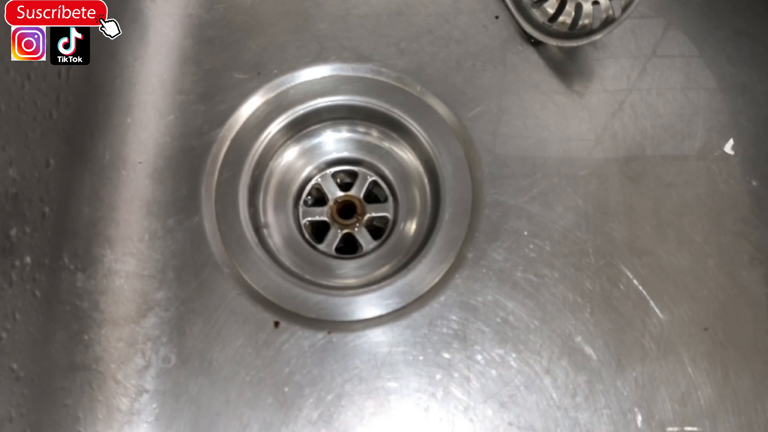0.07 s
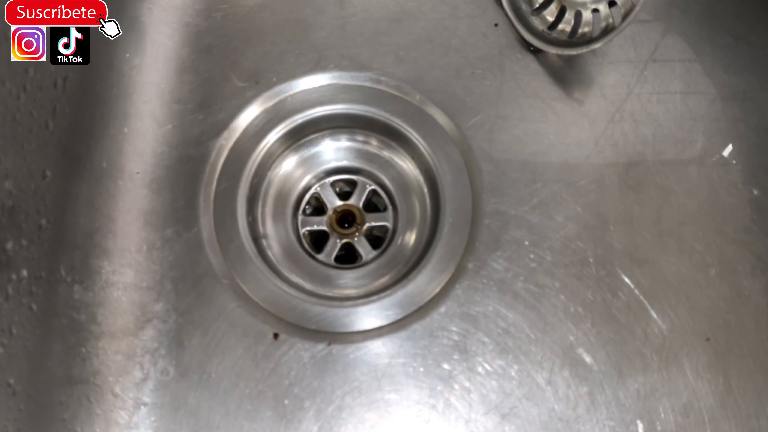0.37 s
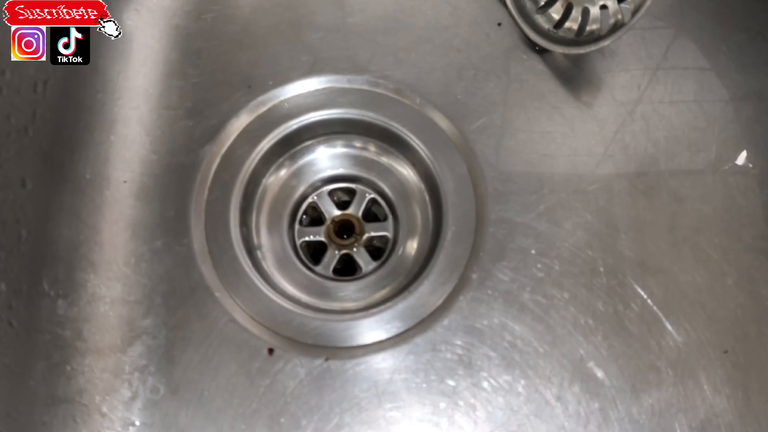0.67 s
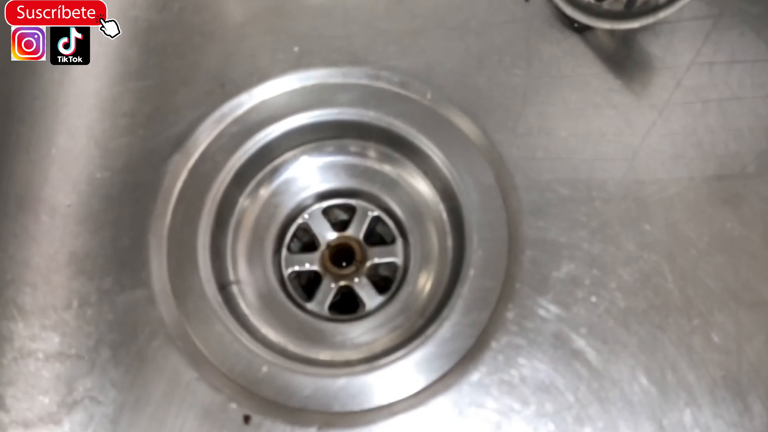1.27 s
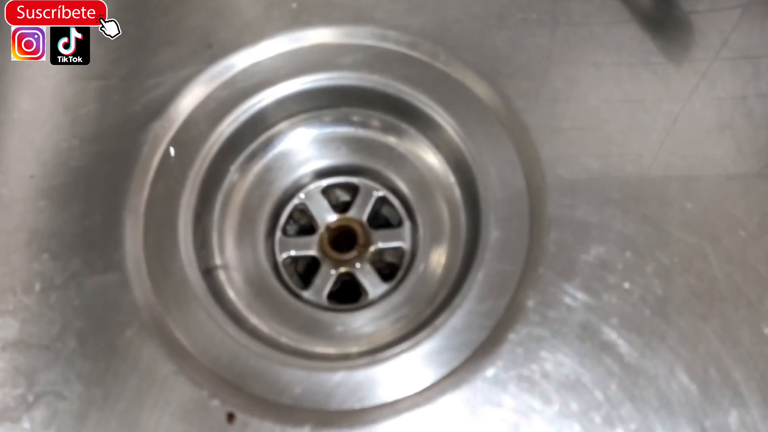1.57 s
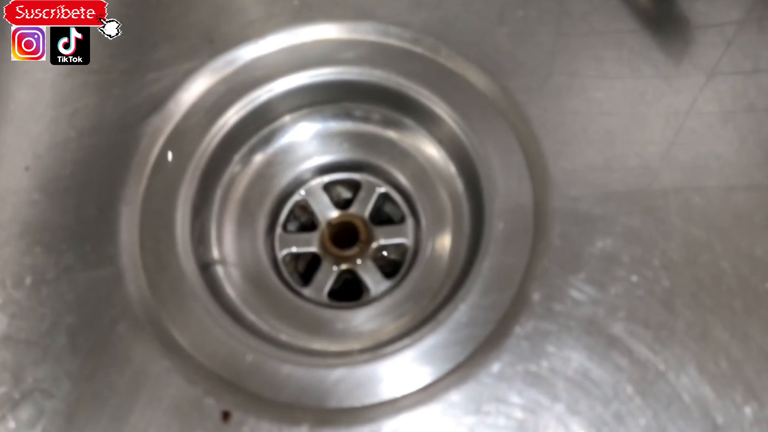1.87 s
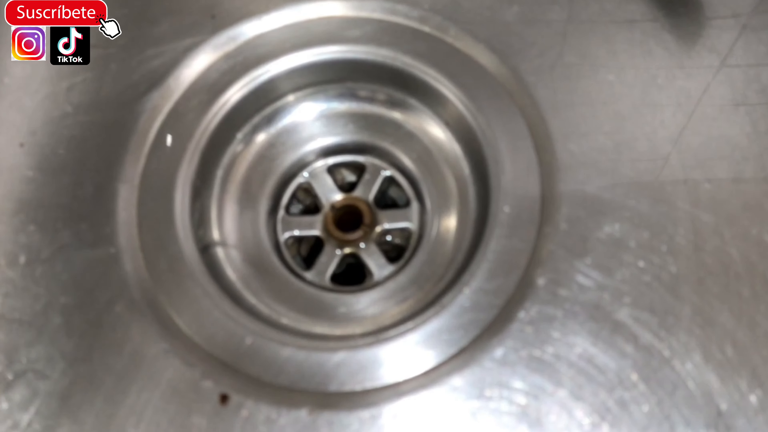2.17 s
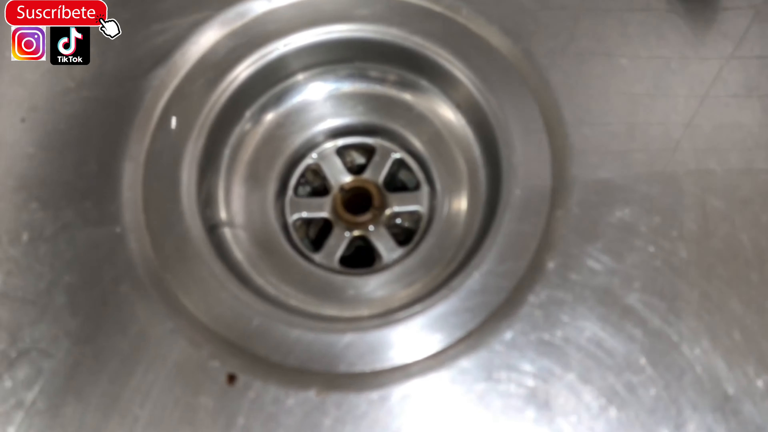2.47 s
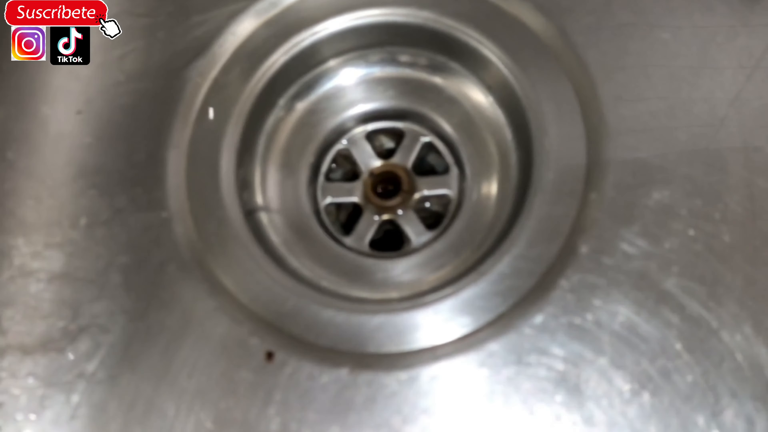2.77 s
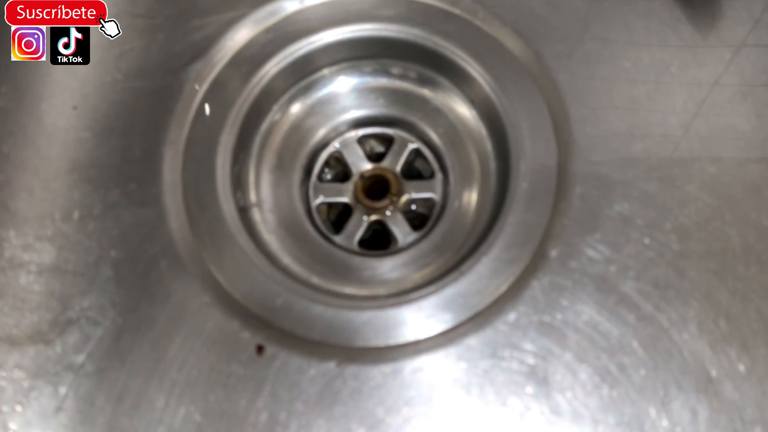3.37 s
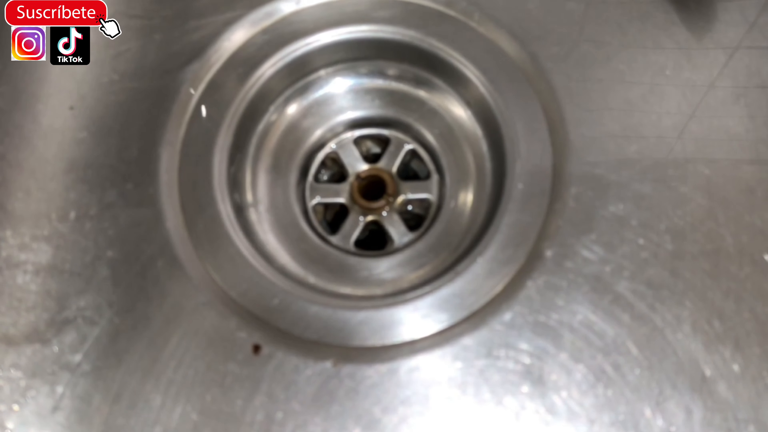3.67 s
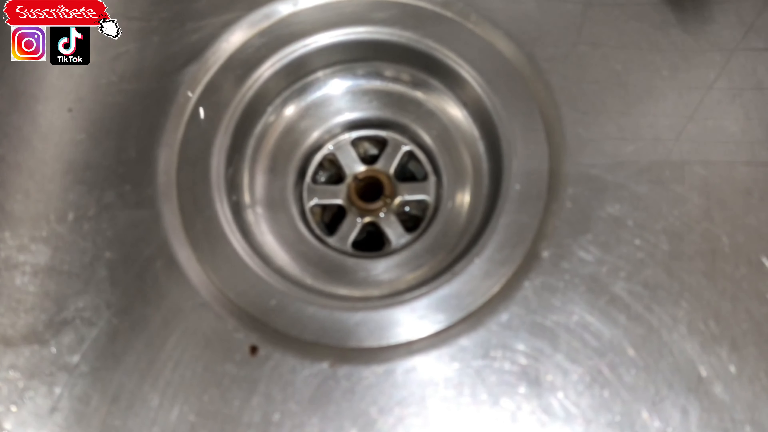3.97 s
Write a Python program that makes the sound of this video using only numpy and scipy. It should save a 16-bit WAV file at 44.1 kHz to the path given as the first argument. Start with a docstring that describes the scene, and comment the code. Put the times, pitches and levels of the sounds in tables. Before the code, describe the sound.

Water gurgling in a kitchen sink drain, hollow glugs and small wet pops close by.

```python
"""In a small, quiet kitchen, air glugs up through the water in a steel sink's drain, close by.
Each big bubble rings briefly and sets the drain pipe booming. Bubble films burst with a wet
crack and leave foam, while tiny bubbles ping and fizz and the water sloshes.
The steel basin and the room ring on as the glugs thin out."""
import sys
import numpy as np
from scipy import signal
from scipy.fft import rfft, irfft
from scipy.io import wavfile

SR = 44100
rng = np.random.default_rng(int(sys.argv[2]) if len(sys.argv) > 2 else 0)


def wrap_up_sound(samples):
    """Save the sound to the file named by the first command line argument, as 16-bit audio."""
    columns = np.atleast_2d(samples).T
    # keep every value between -1 and 1, then stretch to whole-number steps
    tamed = np.clip(columns, -1, 1)
    steps = np.round(tamed * 32767).astype(np.int16)
    wavfile.write(sys.argv[1], SR, steps)


N = 176400  # 4 seconds

# The kitchen's steady rush. Each row: frequency in Hz, relative level in dB.
RUSH_COLOUR = [(25, -33), (100, 9), (250, 10), (600, -14.5), (1200, -15), (4000, -20.5), (9000, -22),
               (16000, -26)]
# The kitchen's echo. Each row: frequency in Hz, fade time in seconds (to drop 60 dB, "t60").
ROOM_FADE = [(100, 0.42), (260, 0.61), (700, 0.13), (1800, 0.17), (5000, 0.14), (14000, 0.19)]
# How alike echoes are in both ears. Each row: frequency in Hz, likeness from 0 to 1.
ECHO_LIKENESS = [(100, 1), (250, 0.7), (450, 0.17), (2000, 0), (10000, 0)]
# How strongly the water is stirred. Each row: time in seconds, level in dB.
STIRRING = [(0, 3.5), (.4, -3.5), (.7, 4), (1.0, -11), (1.3, -2.5), (1.65, -3.5), (1.9, -19), (2.3, -8.5),
            (2.7, -7.5), (3.0, -22), (3.45, -15.5), (3.6, -15.5), (4, -7.5)]
# The notes of the steel basin. Each row: pitch in Hz, width in Hz, left and right boosts in dB.
STEEL_NOTES = [(1566, 38, 5, 6), (1750, 15, 7, -12.5), (1957.3, 55, 14.5, 9.5), (2070, 24, 8.5, 8),
               (2820, 19, 5.5, 4), (2640, 8.8, -1.5, -1.5), (2616, 12, 5, 8), (3147, 43, 9, 11.5),
               (4300, 54, 7, 14), (4930, 20, 4, -11.5), (5230, 90, 5.5, -3)]
# Small bubbles. Each row: start in seconds, level in dB, pitch in Hz,
# fade time of the crackle in seconds, left minus right in dB.
SMALL_BUBBLES = [(0.0094, -31, 4410, 0.021, 16.5), (0.214, -39.5, 2320, 0.046, 13),
                 (0.239, -35, 2780, 0.035, 1), (0.251, -32.5, 2455, 0.062, 4),
                 (0.3568, -33, 2110, 0.036, 6), (0.3782, -33.5, 2540, 0.043, 2.5),
                 (0.5215, -39.5, 7140, 0.069, 0.5), (0.6, -3.5, 2280, 0.012, 4.5),
                 (0.611, -10.5, 1800, 0.012, 5), (0.8775, -23.5, 5010, 0.039, 7.5),
                 (1.233, -56, 1900, 0.012, 4.0), (1.2706, -40, 2250, 0.055, 5),
                 (1.282, -36.5, 2030, 0.032, 4.0), (1.351, -24, 4050, 0.022, 16.5),
                 (1.3806, -29, 4360, 0.036, 9), (1.503, -27.5, 6830, 0.034, 0.0),
                 (1.5304, -36, 2060, 0.05, 1.5), (1.6013, -23, 2020, 0.032, -1),
                 (1.6906, -38, 2080, 0.025, 3), (1.928, -34.5, 2106, 0.024, -1),
                 (1.987, -35, 7730, 0.035, -6), (2.133, -38, 2060, 0.044, 4),
                 (2.1705, -32.5, 2090, 0.065, 3.5), (2.3437, -40.5, 2050, 0.035, 4),
                 (2.3623, -30, 7210, 0.012, -1), (2.5493, -41.5, 2140, 0.039, 0.5),
                 (2.6963, -37, 8680, 0.027, -8), (2.7955, -49.5, 8150, 0.032, -5),
                 (2.825, -39.5, 1950, 0.027, 1.0), (2.8675, -40, 2080, 0.023, 1.0),
                 (2.913, -27, 7700, 0.019, -1), (3.0066, -40, 7540, 0.024, -8),
                 (3.1032, -35.5, 3890, 0.051, 6), (3.2326, -42, 8700, 0.035, -1.5),
                 (3.2909, -26, 2060, 0.018, 5.5), (3.3382, -40.5, 4000, 0.031, 7),
                 (3.7649, -29, 1850, 0.026, 0), (3.9075, -44.5, 2240, 0.067, 5)]
# Bursting films. Each row: start in seconds, level in dB, boosts in dB at 2, 4.5 and 10 kHz,
# fade time in seconds, left minus right in dB.
FILM_BURSTS = [(0.0822, -31.5, -15, -16.5, -1, 0.11, 1.0), (0.1002, -23.5, -14, -19, -12, 0.093, 2.5),
               (0.4319, -14, -18, -13.5, -3, 0.023, 2), (0.5786, -27, -10, -1.5, -12.5, 0.02, 2),
               (0.6, -6.5, -22.5, -8.5, -13, 0.033, 8.5), (0.6194, -13, -15.5, -14.5, -16.5, 0.11, 2.5),
               (0.7372, -30.5, -8, -19.5, -13, 0.066, 3.5), (0.8924, -19, -12, -12, -10, 0.04, 3),
               (0.9966, -37.5, -5, -17, -13, 0.031, 8.5), (1.0695, -42.5, -4.5, -3, -8, 0.028, 0),
               (1.1343, -28, -15, -9, -14.5, 0.066, 1.5), (1.3443, -15, -9.5, -6, -15.5, 0.023, 1),
               (1.5599, -41, 1, -7, -22, 0.035, 6), (1.6013, -9.5, -6, -10.5, -12.5, 0.018, 1.5),
               (1.7494, -14.5, -8.5, -11.5, -8.5, 0.015, 0), (1.8123, -19.5, -19, -5, -8.5, 0.031, -0.5),
               (1.9879, -27, -17.5, -16.5, -7.5, 0.093, 1), (2.1705, -24.5, -4, -15, -11, 0.033, 3.5),
               (2.2238, -34, -7.5, -13.5, -10.5, 0.029, -1), (2.4448, -13.5, -5, -10.5, -7.5, 0.02, 1.5),
               (2.6199, -17, -5.5, -17.5, -13.5, 0.026, 2.0), (2.6858, -34.5, -15, -17, -9, 0.03, 15),
               (2.9003, -31.5, -14.5, -17.5, -18, 0.03, 3.5), (3.0644, -27, -12.5, -16, -7.5, 0.062, 0.0),
               (3.1228, -31, -9.5, -13, -12, 0.027, 2.5), (3.2909, -28, -12, -26, -27, 0.028, -2),
               (3.3523, -28.5, -8.5, -9, -12, 0.04, 0.0), (3.5463, -31.5, -10.5, -16.5, -10.5, 0.11, 6.5),
               (3.5877, -31, -10.5, -14, -5.5, 0.039, 2), (3.7903, -33, -5.5, 0.5, -3, 0.083, 2.5),
               (3.8177, -14.5, -8.5, -16.5, -12, 0.047, 3)]
# The tone colour all bursts start from. Each row: frequency in Hz, level in dB.
FILM_COLOUR = [(60, -15), (250, 22), (700, 13.5), (1100, -17), (1700, -4), (2060, 1), (2900, -9),
               (4500, -4.5), (9000, -6.5), (16000, -27.5)]
# The notes of pipe and basin. Each row: pitch in Hz, width in Hz, left and right boosts in dB.
PIPE_NOTES = [(212.98, 6.98, 14, 16.5), (277.2, 13, 15.5, 17), (340, 14.2, -11, 7.5), (400.1, 12, 17.5, 15),
              (532, 33.6, 3, 12), (579, 7.9, -0.5, 9), (652, 5.2, 1, 4), (769.6, 21.5, 4.5, 18),
              (155, 28, -2, 6), (110.2, 26, 7.5, 9.5)]
# Water churning around a big bubble. Each row: frequency in Hz, level in dB.
CHURN_COLOUR = [(60, -15), (130, 29), (270, 5.5), (400, -2), (560, 6.5), (760, -4), (950, -8), (1400, -9),
                (3000, -16), (16000, -56)]
# Big bubbles. Each row: start in seconds, level in dB, pitch in Hz, fade time in seconds,
# pitch rise per second as a share of the pitch (negative falls), left minus right in dB.
BIG_BUBBLES = [(0.0029, -7, 172.7, 0.037, 5.5, 4), (0.0129, -23.5, 536, 0.1, 8, 14.5),
               (0.0902, -25.5, 281, 0.14, 1.5, 2), (0.1002, -30, 617, 0.093, 0.0, 27.5),
               (0.1321, -4.5, 183, 0.066, 3, 4), (0.2521, -13.5, 484.5, 0.049, -2.5, 1),
               (0.2771, -8.5, 180, 0.043, 4, 4), (0.3922, -7, 513, 0.038, -5, 5),
               (0.4206, -11, 153.3, 0.11, 12, 4.5), (0.431, -18.5, 710, 0.031, -6, 13),
               (0.4307, -14.5, 442, 0.033, 11, 6), (0.5243, -23.5, 730, 0.021, 7, 14),
               (0.571, -4.9, 187, 0.07, 3.5, 4.5), (0.574, -25.5, 398, 0.046, 0, -7),
               (0.6081, -15, 215.6, 0.17, 0.5, 9), (0.6211, -22.5, 491, 0.13, 10.0, 8),
               (0.622, -18.5, 683, 0.041, 5, 12), (0.6227, -11.5, 196.5, 0.17, -0.5, 3.5),
               (0.6784, -19, 164.6, 0.13, 8.5, 3), (0.7372, -28.5, 724, 0.04, 0.5, 21),
               (0.8306, -7.5, 167.7, 0.055, 7.5, 4), (0.8836, -4.5, 129.4, 0.065, 15, 5),
               (0.8937, -10, 270.5, 0.049, -5.5, 1.5), (0.907, -19.5, 620.0, 0.054, -1.5, 13),
               (1.004, -35.5, 720, 0.033, -10, 14), (1.0683, 1.3, 195, 0.03, 2, 2.5),
               (1.1551, -10, 540, 0.033, 0.0, 5), (1.157, -20.5, 716, 0.052, -11, 11),
               (1.1647, -9.5, 176.6, 0.069, 3.5, 3.5), (1.2819, -24.5, 520, 0.03, 14, 6),
               (1.3429, -4.5, 190, 0.053, 3, 2.5), (1.345, -25, 560, 0.04, -1, 11),
               (1.3592, -16, 432.4, 0.068, 11.5, -3), (1.4268, -5.5, 197, 0.047, -4, 3.5),
               (1.5573, -1.5, 192, 0.023, 18, 4.5), (1.559, -25, 423, 0.047, 3, -13),
               (1.6022, -4, 201.7, 0.08, -5, 5.5), (1.602, -20, 384, 0.065, 0.5, -10),
               (1.6524, -9.5, 195.6, 0.11, -1, 4.5), (1.7493, -8.5, 469.4, 0.054, 10.5, -4),
               (1.7549, -2.5, 605, 0.02, 19, 9.5), (1.8074, -0.5, 210, 0.017, -4, 3.5),
               (1.812, -24, 397, 0.049, 4.5, -4), (1.9885, -32, 396, 0.11, 0.0, -6),
               (2.0092, -10, 174.2, 0.042, 6, 4.5), (2.172, -30, 645, 0.04, -10, -2),
               (2.174, -26, 396.0, 0.07, 0.5, -5.7), (2.1812, -20.5, 255, 0.051, -1, 2),
               (2.2215, -9, 162.0, 0.031, 7.5, 4.5), (2.3793, -40.5, 244, 0.42, 13.5, 1),
               (2.4412, -1.1, 222.4, 0.034, -2, 5), (2.445, -16.5, 630, 0.037, -4, 4),
               (2.4472, -8.5, 398.3, 0.076, -2, -6.5), (2.61, -19.5, 770, 0.067, -2, 9),
               (2.62, -10, 465, 0.068, 0.0, 0), (2.622, -10, 698, 0.053, -5.5, 5.5),
               (2.624, 7.2, 413, 0.012, 5, 0.5), (2.656, -23, 500, 0.071, -11, 1),
               (2.6835, -10, 196, 0.035, -2, 4.5), (2.697, -27, 493, 0.066, 1.5, 1),
               (2.8956, -15.5, 202.4, 0.035, -1.5, 4.5), (2.908, -36.5, 427, 0.054, -3.5, -4),
               (3.0608, -32.5, 281, 0.086, -1.5, 0), (3.1191, -6.5, 184, 0.033, 4, 5),
               (3.1257, -21, 409, 0.037, 3, -3.5), (3.2927, -27, 270, 0.032, 4, 1),
               (3.3519, -15, 192, 0.042, -2.5, 5.5), (3.3569, -26.5, 400, 0.067, -2.5, -5),
               (3.358, -24.5, 603, 0.028, 12, 4), (3.5608, -6, 175, 0.023, 1, 5),
               (3.5791, -31.5, 392, 0.092, 2, -3.4), (3.7901, -28, 281, 0.18, 7, 5),
               (3.8131, 2.5, 197, 0.029, 5, 5), (3.8177, -10.5, 404.5, 0.051, 2.5, -2),
               (3.818, -30.5, 573, 0.033, -4, -11)]

# These gains in dB are added to each event's own level.
FIZZ_DB, PING_DB, CRACKLE_DB, SLOSH_DB = -50.5, -3, -8.5, -32
CRACK_DB, SNAP_DB, FOAM_DB = 7, 3, -14


def amp(db):
    """Turns decibels into a number to multiply by."""
    return 10 ** (np.asarray(db) / 20)


def read(points, hz):
    """Looks up a frequency between a table's rows, on a scale of octaves."""
    f, value = np.transpose(points)
    return np.interp(np.log(hz + 1), np.log(f), value)


def add(mix, start, sound, pan_db):
    """Places a sound in time and between left and right."""
    part = mix[:, max(round(start * SR), 0):][:, :len(sound)]
    part += amp([[pan_db / 2], [-pan_db / 2]]) * sound[:part.shape[1]]


def cut_lows(x, hz, order=2):
    """Turns down everything below the given frequency."""
    return signal.sosfilt(signal.butter(order, hz, "high", fs=SR, output="sos"), x)


def room_tone(level_db=-45.5, likeness=0.2):
    """The faint steady rush of the kitchen, only slightly alike in both ears."""
    colour = amp(read(RUSH_COLOUR, np.fft.rfftfreq(N, 1 / SR)))
    left, other = irfft(rfft(rng.standard_normal((2, N))) * colour, N)
    right = likeness * left + np.sqrt(1 - likeness ** 2) * other
    return amp(level_db) * np.array([left, right]) / left.std()


def echoes(x, fade_times):
    """Dense reflections, alike in both ears in the bass, each band dying at its own speed."""
    hz, t, noise = signal.stft(rng.standard_normal((2, SR // 2)), SR, nperseg=256)
    t60 = read(fade_times, hz)[:, None]
    same = read(ECHO_LIKENESS, hz)[:, None]
    noise[1] = same * noise[0] + np.sqrt(1 - same ** 2) * noise[1]
    tail = signal.istft(noise * amp(-60 * t / t60) / np.sqrt(t60), SR, nperseg=256)[1]
    tail = np.pad(tail, ((0, 0), (SR // 600, 0)))  # a short wait before the first echo
    tail /= np.linalg.norm(tail, axis=1, keepdims=True)
    return signal.fftconvolve(x, tail, axes=1)[:, :N]


def resonances(x, notes):
    """Pipe or steel lifts narrow bands, which ring on; a negative boost dips the band."""
    s, gain = 2j * np.pi * np.fft.rfftfreq(2 * N, 1 / SR), 1
    for hz, width, left_db, right_db in notes:
        damping = 2 * np.pi * width
        band = damping * s / (s * s + damping * s + (2 * np.pi * hz) ** 2)
        gain = gain * (1 + (amp([[left_db], [right_db]]) - 1) * band)
    return irfft(rfft(x, 2 * N) * gain)[:, :N]


def stirred(per_s, spread_db):
    """Chance events, louder in stirred water. Each has a start, level, size (0 to 1) and side."""
    when, weakness, size, side = rng.random((round(per_s * N / SR), 4)).T
    start = when * N / SR
    db = np.interp(start, *np.transpose(STIRRING)) - spread_db * np.log(weakness + 0.02)
    return zip(start, db, size, 8 * (side - .5))


def spray(colour, rise_s, t60, grain_db, lump_hz=502, lump_db=3.5):
    """Torn water: a puff of droplets, made of noise that is lumpy in time and in pitch."""
    length = 1024 * int(np.clip(np.ceil(t60 * SR / 1024), 2, 8))
    t, hz = np.arange(length) / SR, np.fft.rfftfreq(length, 1 / SR)
    lumps = np.interp(hz / lump_hz, np.arange(200), rng.uniform(-1, 1, 200))
    droplets = np.interp(t, np.arange(128) * 64 / SR, rng.uniform(-1, 1, 128))
    noise = rng.standard_normal(8192)[:length]
    puff = irfft(rfft(noise) * colour(hz) * amp(lump_db * lumps)) * amp(grain_db * droplets)
    envelope = (1 - np.exp(-t / rise_s)) * amp(-60 * t / t60)
    shaped = puff * envelope
    # Keep the strength the same wherever the droplets happen to fall.
    return shaped * puff.std() * np.linalg.norm(envelope) / np.linalg.norm(shaped)


def crackle(centre_hz, t60, width_octaves=0.29):
    """A small bubble breaks up in a puff centred on its own pitch."""
    def colour(hz):
        peak = np.exp(-(np.log2((hz + 1) / centre_hz) / width_octaves) ** 2)
        gain = peak + amp(-16) * hz / (hz + 1000)  # with a faint, wide hiss
        return gain / np.sqrt(np.mean(gain ** 2))
    return spray(colour, rise_s=0.00094, t60=t60, grain_db=7.5)


def bubble(hz, t60, rise, swell_cycles):
    """A pocket of air swells into a dying tone; a positive rise lifts it as it nears the surface."""
    t = np.arange(SR // 5) / SR
    tone = np.sin(2 * np.pi * hz * (t + rise * t * t / 2))
    swell = 1 - np.exp(-(t * hz / swell_cycles) ** 2)
    return tone * swell * amp(-60 * t / t60)


def snap(colour):
    """The instant a film gives way: one short click."""
    click = irfft(colour(np.fft.rfftfreq(256, 1 / SR)))
    return np.roll(click, 32)[:64] * np.hanning(64)


def bursts(snap_delay_s=.0025):
    """The films of the big bubbles tear with a wet crack and leave fizzing foam."""
    out = np.zeros((2, N))
    for start, db, low_db, mid_db, high_db, t60, pan_db in FILM_BURSTS:
        boosts = [(2000, low_db), (4500, mid_db), (10000, high_db)]
        colour = lambda hz: amp(read(FILM_COLOUR, hz) + read(boosts, hz))
        crack = spray(colour, rise_s=0.00072, t60=t60, grain_db=6)
        foam = spray(colour, rise_s=0.017, t60=0.13, grain_db=5.5)
        add(out, start, amp(db + CRACK_DB) * crack, pan_db)
        add(out, start + snap_delay_s, amp(db + SNAP_DB) * snap(colour), pan_db)
        add(out, start, amp(db + FOAM_DB) * foam, pan_db)
    return out


def pops(basin_t60=0.055, low_cut_hz=415):
    """Bursts, crackling pings and fine fizz at the strainer, thrown about by basin and room."""
    out = bursts()
    for start, db, hz, t60, pan_db in SMALL_BUBBLES:
        ping = bubble(hz, 0.43 * t60, rise=3.7, swell_cycles=1.3)
        add(out, start, amp(db + PING_DB) * ping, pan_db)
        add(out, start, amp(db + CRACKLE_DB) * crackle(hz, t60), pan_db)
    for start, db, size, pan_db in stirred(per_s=190, spread_db=2.5):
        fizz = crackle(13000 * 2 ** (-3.2 * size), t60=0.015)  # bigger sounds lower
        add(out, start, amp(db + FIZZ_DB) * fizz, pan_db)
    basin_echo = amp(3) * echoes(out, [(1000, basin_t60)])
    ringing = cut_lows(resonances(out + basin_echo, STEEL_NOTES), low_cut_hz)
    return ringing + amp(-9.5) * echoes(ringing, ROOM_FADE)


def slosh(top_hz=731, bottom_hz=202):
    """Stirred water sloshes with many faint, low bubbles."""
    out = np.zeros((2, N))
    for start, db, size, pan_db in stirred(per_s=70, spread_db=2):
        hz = top_hz * (bottom_hz / top_hz) ** size
        tone = bubble(hz, t60=0.032, rise=2.1, swell_cycles=0.53)
        add(out, start, amp(db + SLOSH_DB) * tone, pan_db)
    return out


def gulp(hz, t60, rise, churn_db=-2.5):
    """A big bubble's tone, with churning water at and above its pitch."""
    tone = bubble(hz, t60, rise, swell_cycles=0.93)
    colour = lambda f: amp(read(CHURN_COLOUR, f)) * np.minimum(f / hz, 1) ** 2
    churn = spray(colour, rise_s=0.0038, t60=.05, grain_db=2)
    return tone[:len(churn)] + amp(churn_db) * abs(tone).max() * churn


def glugs(right_lag_s=.0003):
    """Big bubbles and the slosh around them boom in the pipe and spread into the kitchen."""
    out = slosh()
    for start, db, hz, t60, rise, pan_db in BIG_BUBBLES:
        add(out, start, amp(db) * gulp(hz, t60, rise), pan_db)
    t = np.arange(N) / SR
    out[1] = np.interp(t - right_lag_s, t, out[1])  # the right ear hears it a little later
    boom = cut_lows(resonances(out, PIPE_NOTES), hz=37)
    upper = cut_lows(boom, hz=400, order=3)
    return boom + echoes(amp(-8) * boom + amp(-5) * upper, ROOM_FADE)


def scene():
    """The drain glugs and pops over the hush of the kitchen."""
    return glugs() + pops() + room_tone()


def record(dry, ceiling=.92, top_hz=16300):
    """Rounds off the loudest peaks, then cuts the deepest bass and the highest treble."""
    rounded = dry / (1 + (dry / ceiling) ** 8) ** (1 / 8)
    treble_cut = signal.firwin(401, top_hz, window=("kaiser", 9), fs=SR)
    return signal.oaconvolve(cut_lows(rounded, hz=18, order=1), treble_cut[None], "same")


dry = scene()
out = record(dry)
wrap_up_sound(out)
```